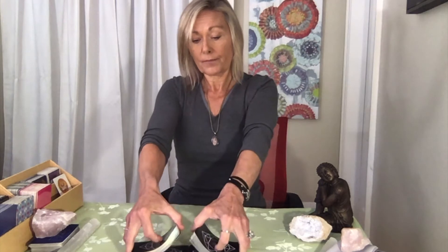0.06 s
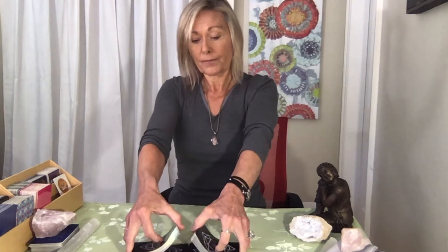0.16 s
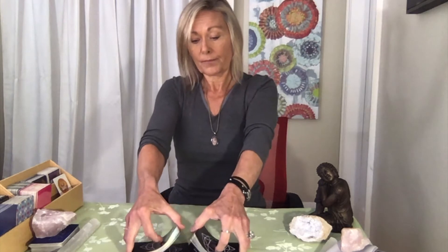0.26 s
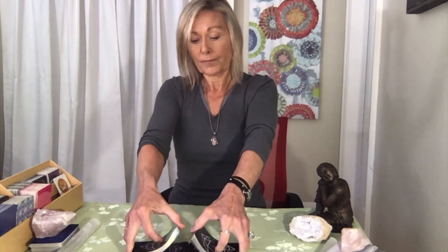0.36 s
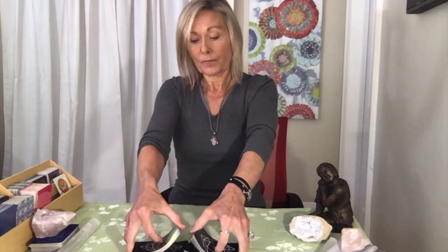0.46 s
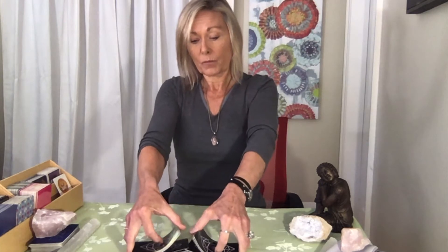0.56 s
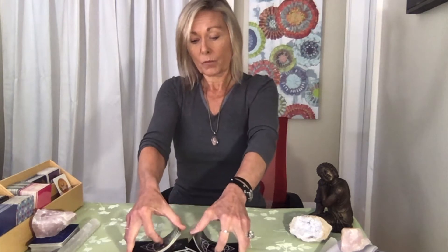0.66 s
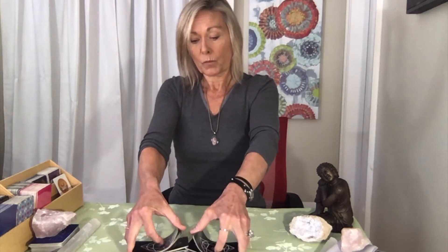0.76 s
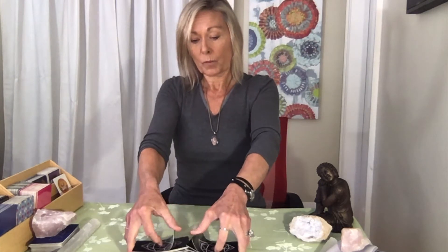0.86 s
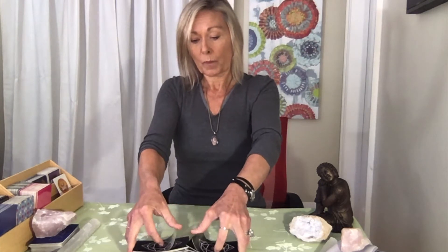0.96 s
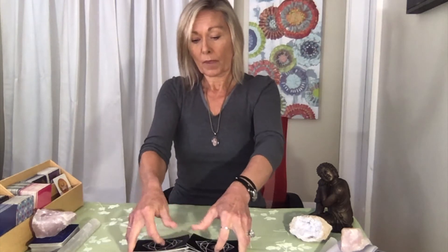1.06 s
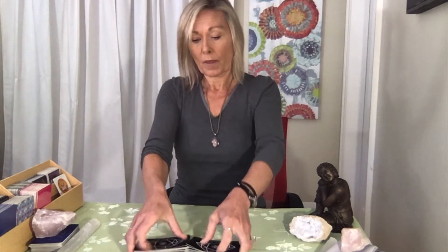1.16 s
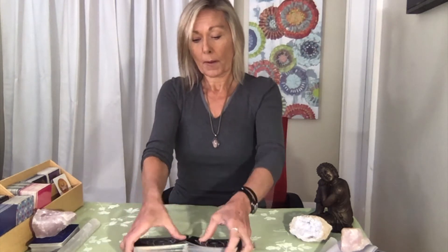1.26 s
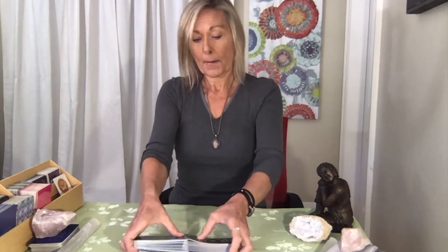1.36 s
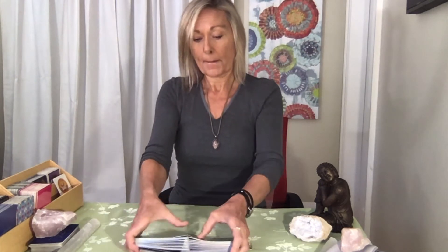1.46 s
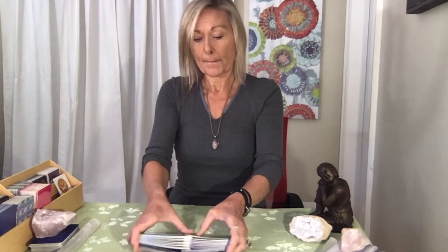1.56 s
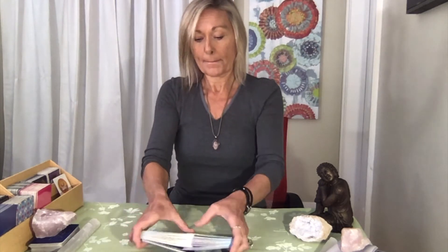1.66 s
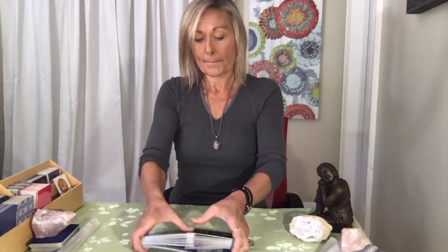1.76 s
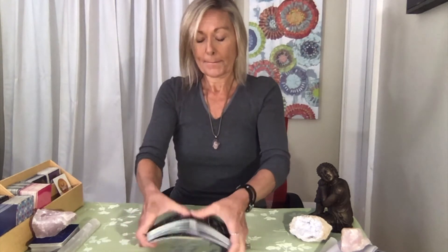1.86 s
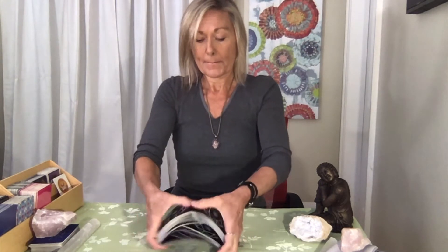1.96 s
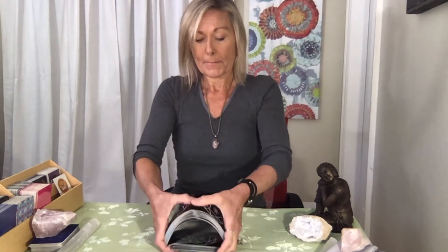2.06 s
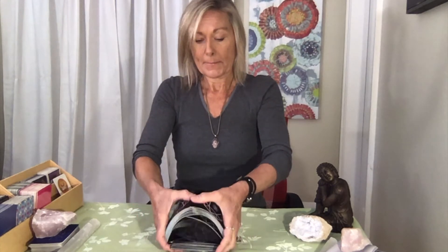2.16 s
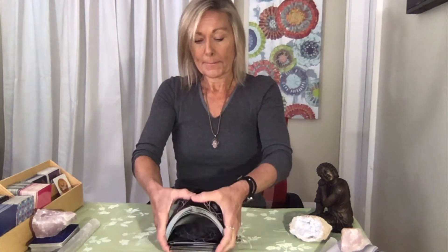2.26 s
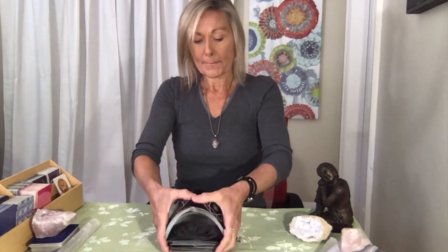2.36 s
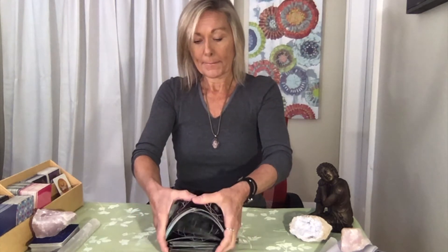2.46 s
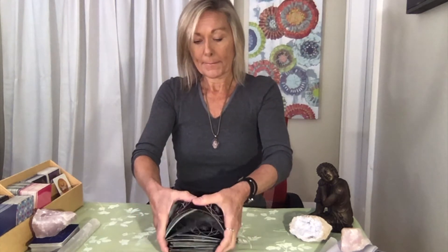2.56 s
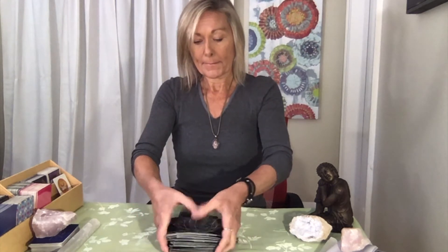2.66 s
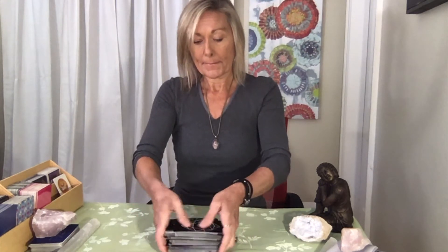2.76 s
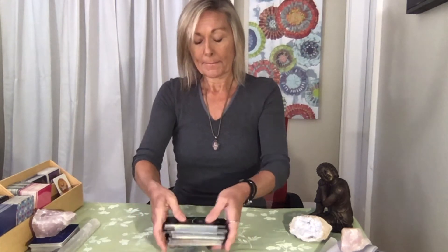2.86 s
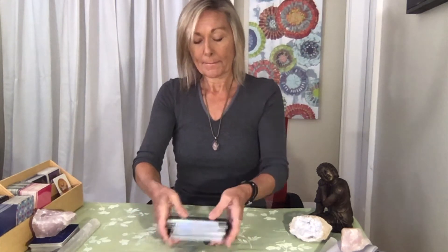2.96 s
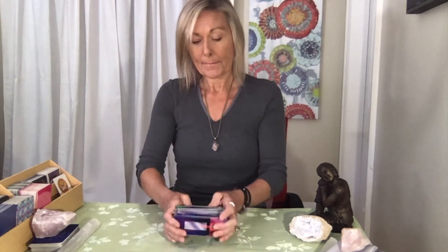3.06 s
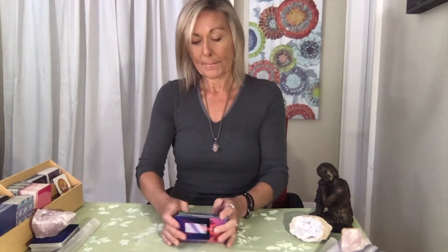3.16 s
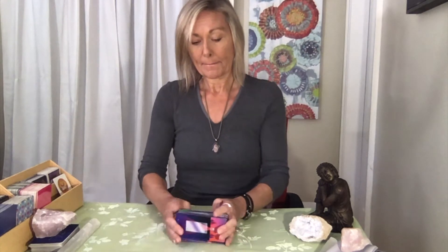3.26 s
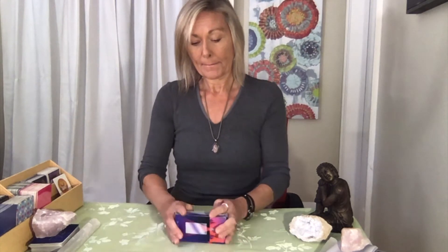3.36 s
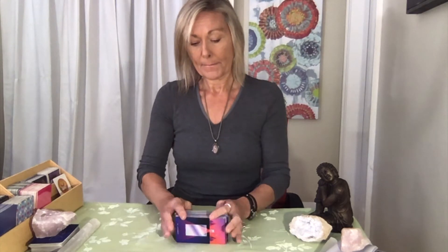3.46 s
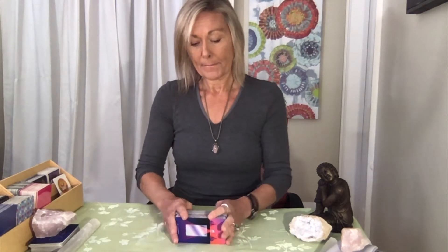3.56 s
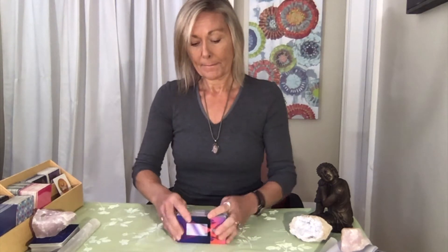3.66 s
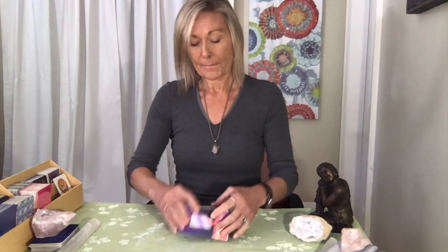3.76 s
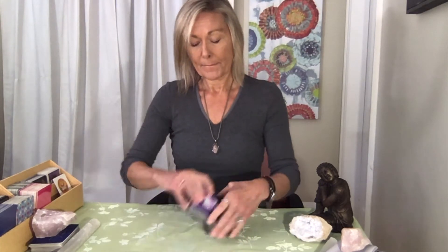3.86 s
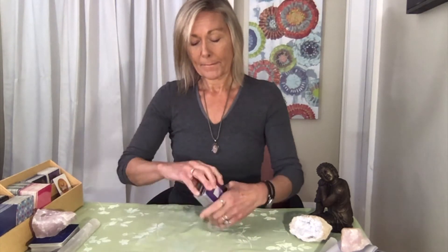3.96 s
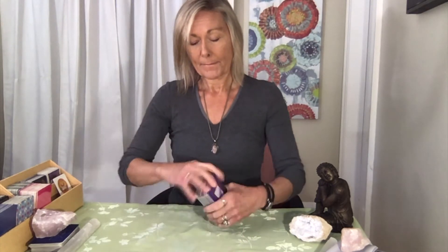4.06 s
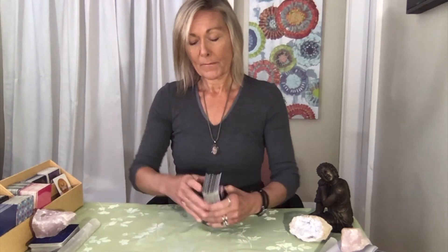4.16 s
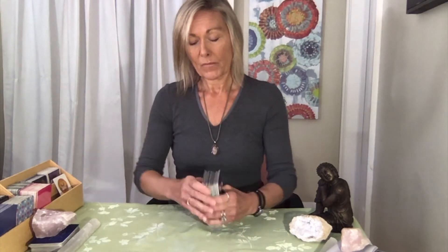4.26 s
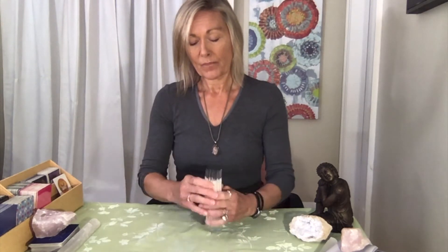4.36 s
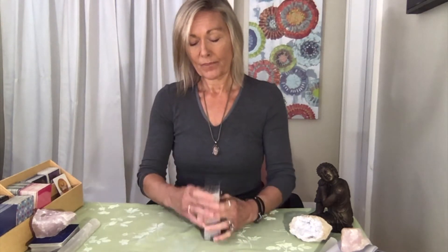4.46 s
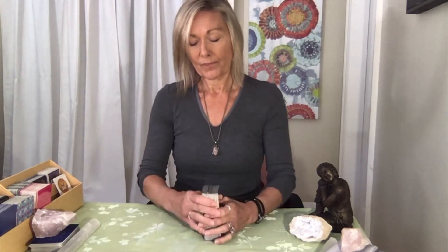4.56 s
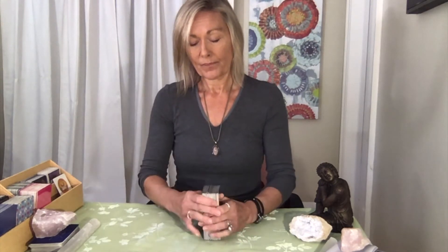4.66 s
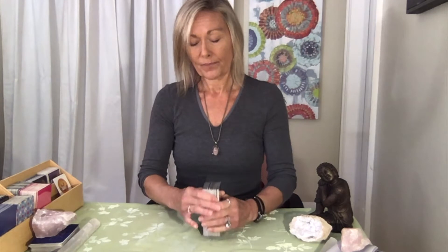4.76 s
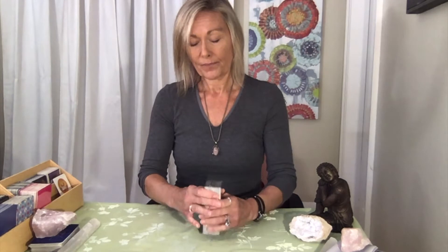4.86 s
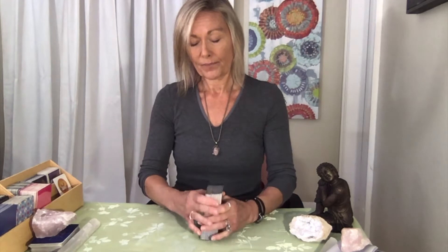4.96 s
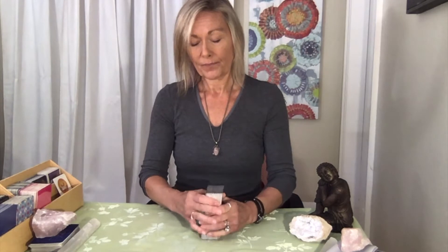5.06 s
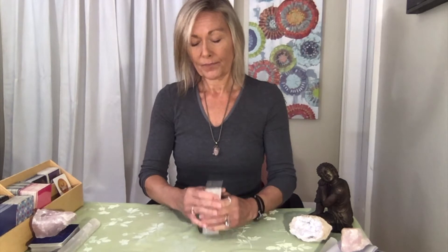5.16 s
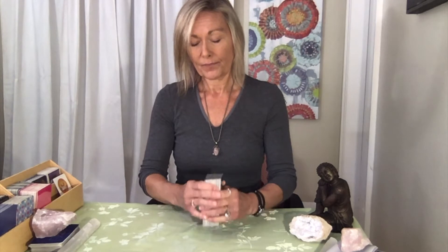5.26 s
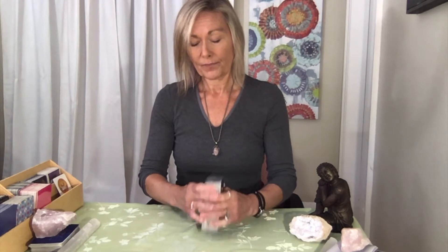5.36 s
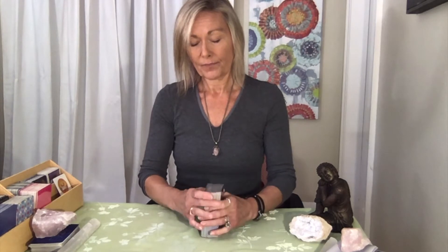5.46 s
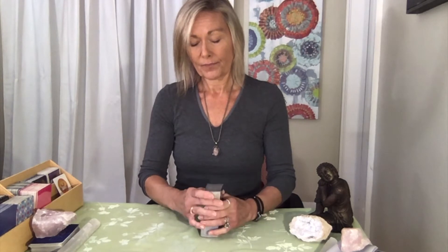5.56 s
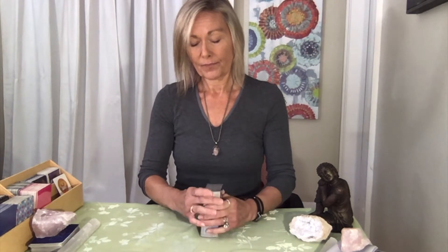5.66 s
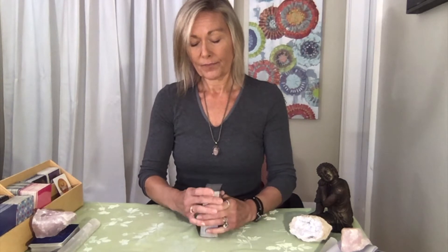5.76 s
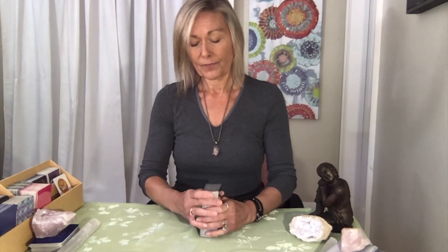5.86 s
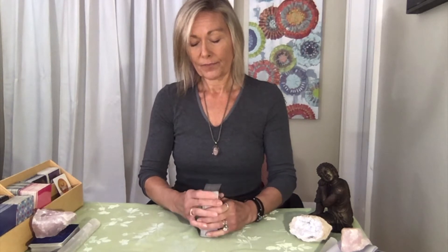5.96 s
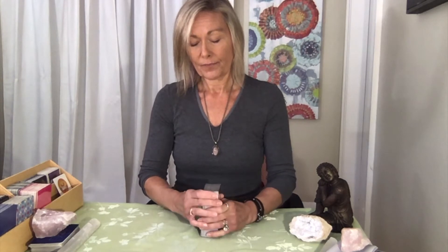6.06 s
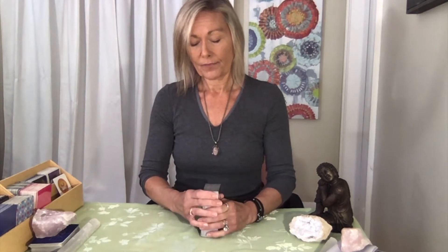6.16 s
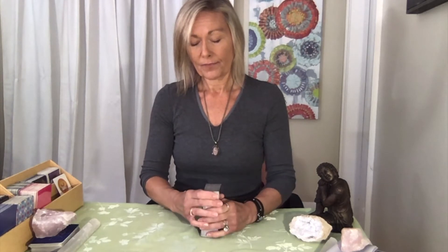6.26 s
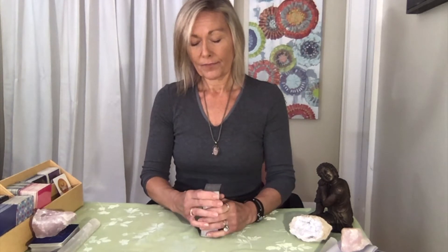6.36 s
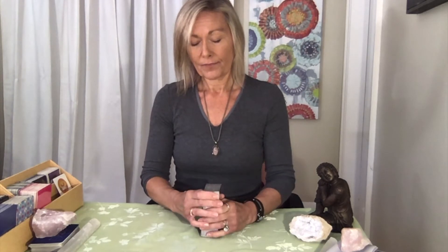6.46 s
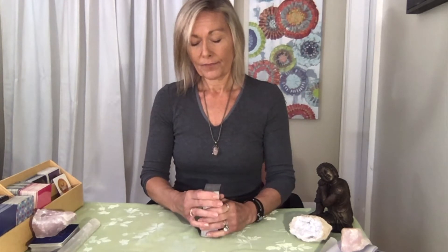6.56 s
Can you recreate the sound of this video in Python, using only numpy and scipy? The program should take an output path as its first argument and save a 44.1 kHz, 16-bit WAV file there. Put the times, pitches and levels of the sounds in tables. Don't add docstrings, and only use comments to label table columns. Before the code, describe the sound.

Stiff cards slap down in a crisp riffle, collapse in a hissing bridge, then the squared pack knocks woodenly on a table in a quiet room.

```python
import sys
import numpy as np
from scipy import signal
from scipy.fft import rfft, irfft, next_fast_len
from scipy.io import wavfile

SR = 44100
rng = np.random.default_rng(int(sys.argv[2]) if len(sys.argv) > 2 else 0)


def attenuation_scalar(level_db):
    decades = np.asarray(level_db, float) / 20
    return 10 ** decades


def wav_record(signal):
    frames = np.transpose(np.atleast_2d(signal))
    bounded = np.clip(frames, -1, 1)
    quanta = np.round(bounded * 32767).astype(np.int16)
    wavfile.write(sys.argv[1], SR, quanta)


N = 291456

# freq_hz, level_db (per Hz)
AIR_SPECTRUM = [(12, -56), (20, -21), (37, -2), (70, -10), (129, 1), (162, -9), (220, -10), (290, -20),
                (325, -13.5), (466, -20), (670, -19.5), (2100, -32.5), (3020, -40.5), (7360, -50.5),
                (15600, -69.5)]
AIR_DB = -52.5
# freq_hz, t60_s
ROOM_DECAY = [(200, 0.57), (1000, 0.44), (3000, 0.34), (8000, 0.19), (15000, 0.29)]
# delay_s, level_db
REFLECTIONS = [(.0085, -13.5), (.0026, -18.5), (0.023, -13)]
# freq_hz, width_hz, level_db
MIC_COLOUR = [(1250, 290, 2.5), (1596, 180, -3.5), (2100, 206, 3.5), (4180, 330, -2.5), (7360, 590, 1.5)]

# freq_hz, level_db, t60_s
TABLE_MODES = [(67.3, -8.5, 0.85), (95.5, -7, 0.27), (108, -11, 0.49), (127.7, 7, 0.12), (160.1, 5, 0.19),
               (176.6, 6.5, 0.12), (215, -11, 0.085), (235.2, -2, 0.29), (290, -1.5, 0.11),
               (382.3, 2.5, 0.27), (406.2, 3, 0.15), (423, -10.5, 0.19), (500, -4, 0.12), (558, -24, 0.089),
               (673.6, -5.5, 0.12), (710, -7, 0.13), (817, -7.5, 0.19), (884, -7, 0.13), (1180, -24.5, .08)]
# low_hz, high_hz, level_db, t60_s
RUMBLE_BANDS = [(39.7, 130, -27.5, 0.97), (124, 320, -24.5, 0.53), (452, 680, -30, 0.34),
                (950, 1700, -40, 0.2), (1500, 1900, -58, 0.08)]
# below_140hz_db, to_320hz_db, to_470hz_db
DECK_TAPS = [
    (2.042, -41.5, -24, -8.5, -12.5),
    (2.7, -43, -22, -9.5, -11),
    (2.098, -44, -9.5, -13, -14.5),
    (3.194, -31, -7, -32, -11),
    (4.496, -15.5, -12, -12, -10),
    (4.553, -32, -30, -4.5, -13),
    (4.946, -27, -9, -17, -10.5),
    (5.433, -18, -11.5, -4.5, -12),
    (5.46, -29.5, 0.5, -2, -9),
    (5.5, -35, -14, 0.5, -27.5),
]
TOP_MODES_DB, TOP_FOLLOWS = -8.5, 0.48
CLOTH_S = 0.012
SWAY_HZ, SWAY_DB, SWAY_T60_S, SWAY_RISE_S = 51.2, -9, 0.36, 0.064

# start_s, pressure_db, hiss_db (above pressure; grows with speed)
SLIDE_GESTURES = [
    [(0.04, -68, -32), (0.09, -54, 5.5), (0.16, -49.5, -9.5), (0.5, -48, -7.5), (0.76, -55, 0.5),
     (0.862, -39, -2.5), (0.972, -62, -8.5), (1.016, -55.5, 16), (1.2, -91, -6)],
    [(1.95, -72, -3), (2.04, -58, -3.5), (2.12, -61, 10.5), (2.22, -56.5, 3), (2.33, -56, 10),
     (2.43, -50, -8), (2.6, -59, -4), (2.68, -53, 9), (2.86, -82, -18)],
]
# start_s, length_s, level_db
FINGER_SHIFTS = [
    (1.51, 0.13, -72),
    (2.99, 0.22, -74.5),
    (3.666, 0.13, -82),
]
# freq_hz, level_db (per Hz)
BODY_SPECTRUM = [(940, -49), (1600, -12), (2080, 4.5), (2550, -0.5), (4440, -12), (5000, -15), (6500, -10),
                 (11000, -120)]
# freq_hz, level_db (per Hz)
HISS_SPECTRUM = [(2060, -9), (3500, -2.5), (4440, -5.5), (4970, -3.5), (7370, 0), (8830, -7.5),
                 (12100, -14), (13100, -15.5), (15600, -23.5)]
# freq_hz, level_db (per Hz)
FLAP_SPECTRUM = [(210, -13.5), (350, -3.5), (410, -2), (714, -4.5), (1090, -8), (1800, -11), (2340, -19),
                 (3960, -120)]
BRIDGE_BEND, BRIDGE_FLAP_DB, BRIDGE_FROM_S = 2.07, 1.5, 1.9
RUSTLE_BODY_DB, RUSTLE_HISS_DB, RUSTLE_FLAP_DB = -29, -33.5, -26
BODY_DB_PER_OCTAVE, FLAP_DB_PER_OCTAVE = 3, -8
RUSTLE_RISE_S, RUSTLE_T60_S = 0.012, 0.17
FLICKS_PER_S, FLICK_DB, FLICK_CYCLES = 170, -7.5, 8

# start_s, level_db, pitch_hz, brightness_db
CARD_SNAPS = [(2.042, -31, 1770, -10), (2.142, -31.5, 2100, 6), (2.2223, -44.5, 2220, -25),
              (2.2798, -45.5, 2800, -17.5), (2.2942, -35.5, 2210, 1), (2.394, -33.5, 1920, -25),
              (2.4166, -33.5, 2240, -24), (2.423, -32, 2050, -18), (2.444, -39, 2250, -12),
              (2.4684, -30, 1100, -2), (2.475, -27, 1310, -26), (2.4913, -34.5, 1280, -25),
              (2.5002, -70, 2010, -17), (2.5221, -68, 1260, -4), (2.5513, -30.5, 2240, -2),
              (2.599, -37, 2870, -10), (2.6672, -34.5, 1330, -2), (2.7005, -27, 1350, -13),
              (2.733, -45, 950, -25), (2.753, -47, 3400, -20), (3.55, -40, 1296, -20),
              (1.2614, -53, 2860, -45)]
SNAP_PUSH_DB = -26.5
# start_s,
# level_db, pitch_hz, table_push_db
CARD_SLAPS = [(0.0886, -36.5, 1310, -46.5), (0.1235, -34.5, 2110, -43.5), (0.1723, -36, 2520, -36.5),
              (0.181, -20.5, 1280, -41), (0.2399, -45.5, 1010, -52), (0.2811, -25, 1910, -28),
              (0.3006, -27, 2140, -39), (0.3075, -41, 2930, -48), (0.3244, -33.5, 1000, -42),
              (0.3796, -23, 1120, -28.5), (0.4194, -31, 2060, -58), (0.4564, -21, 1250, -29),
              (0.502, -22, 2100, -31.5), (0.5645, -19, 2040, -25.5), (0.5731, -20, 2440, -55),
              (0.649, -25.5, 1260, -31.5), (0.6762, -16, 2260, -37), (0.6835, -17, 3430, -30),
              (0.728, -26.5, 2100, -37.5), (0.7773, -23.5, 1870, -36), (0.8057, -26, 2150, -31.5),
              (0.8253, -21.5, 2140, -39.5), (0.8317, -37.5, 2060, -33), (0.8564, -26.5, 1220, -57),
              (0.8641, -21, 2400, -46), (0.9946, -27, 2700, -37), (1.0057, -29, 1260, -72),
              (1.0112, -19.5, 2210, -56), (1.0204, -47, 3270, -53), (0.988, -36, 3780, -42)]
CRACK_DB, CRACK_FOLLOWS = -38.5, 0.76
LOW_PUSH_DB, UPPER_PUSH_DB, MUTED_DB = -4, -5.5, -5


def rms_one(x):
    return x / np.sqrt(np.mean(x ** 2) + 1e-20)


def at_hz(points, hz):
    points = np.array(points)
    return np.interp(np.log(hz + 1e-9), np.log(points[:, 0]), points[:, 1])


def coloured(x, spectrum):
    size = next_fast_len(N)
    hz = np.arange(size // 2 + 1) * SR / size
    return rms_one(irfft(rfft(x, size) * attenuation_scalar(at_hz(spectrum, hz)), size)[:N])


def band(x, low_hz, high_hz):
    return signal.sosfilt(signal.butter(2, [low_hz, high_hz], "band", fs=SR, output="sos"), x)


def ring(clicks, hz, t60):
    radius, turn = attenuation_scalar(-60 / (t60 * SR)), 2 * np.pi * hz / SR
    return signal.lfilter([0, np.sin(turn)], [1, -2 * radius * np.cos(turn), radius ** 2], clicks + 1e-18)


def die_away(x, t60):
    return signal.lfilter([1], [1, -attenuation_scalar(-60 / (t60 * SR))], x + 1e-18)


def clicks_at(times, levels_db):
    clicks = np.zeros(N)
    clicks[np.round(times * SR).astype(int)] = attenuation_scalar(levels_db)
    return clicks


def room_air():
    return attenuation_scalar(AIR_DB) * coloured(rng.standard_normal(N), AIR_SPECTRUM)


def room(x, wet_db):
    t = np.arange(SR // 2) / SR
    white = rng.standard_normal(len(t))
    edges = 60 * 2 ** np.arange(0, 8.5)
    tail = 0
    for low, high in zip(edges, edges[1:]):
        tail = tail + band(white, low, high) * attenuation_scalar(-60 * t / at_hz(ROOM_DECAY, np.sqrt(low * high)))
    tail *= np.clip(t / 0.016, 0, 1) ** 2
    response = attenuation_scalar(wet_db) * tail / np.sqrt(np.sum(tail ** 2))
    response[0] = 1
    for delay_s, level_db in REFLECTIONS:
        response[round(delay_s * SR)] += attenuation_scalar(level_db)
    return signal.fftconvolve(x, response)[:N]


def table_knocks(times, strengths_db, contact_s, damping):
    push = np.hanning(round(contact_s * SR) + 2)
    out = np.zeros(N)
    for k, ((hz, level_db, t60), blows_db) in enumerate(zip(TABLE_MODES, strengths_db.T)):
        out += (-1) ** k * ring(clicks_at(times, blows_db + level_db), hz, t60 * damping)
    return np.convolve(out, push / push.sum())[:N]


def table_sway(times, levels_db):
    t = np.arange(SR // 2) / SR
    swell = np.clip(t / SWAY_RISE_S, 0, 1) ** 2 * attenuation_scalar(-60 * t / SWAY_T60_S)
    swing = swell * np.sin(2 * np.pi * SWAY_HZ * t)
    return signal.fftconvolve(clicks_at(times, levels_db + SWAY_DB), swing / abs(swing).max())[:N]


def table_rumble(times, levels_db):
    give = np.hanning(round(CLOTH_S * SR))
    blows = np.convolve(clicks_at(times, levels_db), give / give.sum())[:N]
    out = np.zeros(N)
    for low_hz, high_hz, level_db, t60 in RUMBLE_BANDS:
        noise = rms_one(band(rng.standard_normal(N), low_hz, high_hz))
        out += attenuation_scalar(level_db) * die_away(blows, t60) * noise
    return out


def deck_taps():
    rows = np.array(DECK_TAPS)
    times, levels_db = rows[:, 0], rows[:, 1]
    colours_db = np.c_[rows[:, 2:], TOP_MODES_DB + TOP_FOLLOWS * rows[:, 3]]
    group = np.searchsorted([140, 320, 470], np.array(TABLE_MODES)[:, 0])
    strengths_db = levels_db[:, None] + colours_db[:, group] + 0.59
    knocks = table_knocks(times, strengths_db, contact_s=0.0013, damping=0.87)
    return knocks + table_rumble(times, levels_db) + table_sway(times, levels_db + rows[:, 2])


def flutter(per_s, depth_db):
    knots = rng.standard_normal(round(N / SR * 400))
    slow = rms_one(signal.sosfilt(signal.butter(1, per_s / 200, output="sos"), knots))
    return attenuation_scalar(depth_db * np.interp(np.arange(N) / SR * 400, np.arange(len(slow)), slow))


def rustle(times, levels_db):
    rise = np.exp(-1 / (RUSTLE_RISE_S * SR))
    return signal.lfilter([1 - rise], [1, -rise], die_away(clicks_at(times, levels_db), RUSTLE_T60_S))


def corner_flicks():
    sizes = attenuation_scalar(3.5 * np.minimum(rng.exponential(1, N), 3)) * (rng.random(N) < FLICKS_PER_S / SR)
    dealt = rng.integers(0, 8, N)
    smear = rng.standard_normal(60) * np.hanning(60)
    struck = np.zeros(N)
    for k, hz in enumerate(np.geomspace(1100, 7000, 8)):
        struck += ring(sizes * (dealt == k), hz, FLICK_CYCLES / hz)
    return rms_one(band(np.convolve(struck, smear)[:N], 900, 9000))


def friction_grain():
    sizes = attenuation_scalar(1.35 * np.minimum(rng.exponential(1, N), 4)) * rng.choice([-1, 1], N)
    ticks = rms_one(sizes * (rng.random(N) < 700 / SR))
    return ticks * 0.3 + rng.standard_normal((3, N))


def slide_levels():
    t = np.arange(N) / SR
    s, peak_db, hz, _ = np.transpose([*CARD_SLAPS, *CARD_SNAPS])
    body = rustle(s, peak_db + RUSTLE_BODY_DB + BODY_DB_PER_OCTAVE * np.log2(hz / 2000))
    hiss = rustle(s, peak_db + RUSTLE_HISS_DB)
    flap = rustle(s, peak_db + RUSTLE_FLAP_DB + FLAP_DB_PER_OCTAVE * np.log2(hz / 1500))
    for rows in SLIDE_GESTURES:
        s, body_db, hiss_db = np.transpose([(rows[0][0] - 0.03, -100, 0), *rows])
        body += attenuation_scalar(np.interp(t, s, body_db - 9.5, -140, -140))
        hiss += attenuation_scalar(np.interp(t, s, body_db + hiss_db - 6.5, -140, -140))
        flap += attenuation_scalar(np.interp(t, s, body_db - hiss_db - 23, -140, -140))
    for s, length_s, level_db in FINGER_SHIFTS:
        touch = attenuation_scalar(level_db) * np.sin(np.pi * np.clip((t - s) / length_s, 0, 1))
        body += attenuation_scalar(-22.5) * touch
        hiss += attenuation_scalar(-11.5) * touch
        flap += attenuation_scalar(2) * touch
    return body, hiss, flap


def card_slides():
    body, hiss, flap = slide_levels()
    grain = friction_grain()
    flat = coloured(grain[2], FLAP_SPECTRUM)
    arched = attenuation_scalar(BRIDGE_FLAP_DB) * coloured(grain[2], np.array(FLAP_SPECTRUM) * [BRIDGE_BEND, 1])
    flapping = np.where(np.arange(N) / SR < BRIDGE_FROM_S, flat, arched)
    mix = body * flutter(83, depth_db=2) * coloured(grain[0], BODY_SPECTRUM)
    mix += hiss * flutter(96, depth_db=1.5) * coloured(grain[1], HISS_SPECTRUM)
    mix += flap * flutter(60, depth_db=0.5) * flapping
    mix += (body + hiss) * attenuation_scalar(FLICK_DB) * corner_flicks()
    return flutter(40, depth_db=1.2) * mix


def card_hit(hz, crack_db, body_db, crack_s):
    t = np.arange(1024) / SR
    dull, sharp = rng.standard_normal((2, 1024)) * np.exp(-t / crack_s) * np.clip(t / 0.001, 0, 1)
    dull[30] -= 2.5
    flap = band(band(dull, 0.33 * hz, 2.8 * hz), 0.5 * hz, 5.8 * hz)
    body = ring(dull, hz, 6 / hz) + 2.5 * ring(dull, hz * 1.51, 3 / hz) + 5 * flap
    crack = band(band(sharp, 3200, 13000), 2600, 17000)
    return attenuation_scalar(body_db) * body / abs(body).max() + attenuation_scalar(crack_db - 10.5) * crack / abs(crack).max()


def card_hits(rows, crack_db, body_db, crack_s):
    out = np.zeros(N + 1024)
    for (s, peak_db, hz, _), edge_db in zip(rows, crack_db):
        out[round(s * SR):][:1024] += attenuation_scalar(peak_db) * card_hit(hz, edge_db, body_db, crack_s)
    return out[:N]


def card_thuds(times, push_db):
    mode_hz = np.array(TABLE_MODES)[:, 0]
    strengths_db = push_db[:, None] + np.where(mode_hz > 270, UPPER_PUSH_DB, LOW_PUSH_DB)
    strengths_db += rng.normal(0, 3.9, strengths_db.shape)
    strengths_db += MUTED_DB * (abs(mode_hz - 400) < 30)
    return table_knocks(times, strengths_db, contact_s=0.0021, damping=0.51)


def bridge_snaps():
    s, peak_db, _, bright_db = np.transpose(CARD_SNAPS)
    cards = card_hits(CARD_SNAPS, bright_db, body_db=-1.6, crack_s=0.0024)
    return cards, attenuation_scalar(-16.5) * card_thuds(s, peak_db + SNAP_PUSH_DB)


def riffle_slaps():
    s, peak_db, _, push_db = np.transpose(CARD_SLAPS)
    crack_db = CRACK_DB + CRACK_FOLLOWS * (peak_db + 15.5) - peak_db
    cards = card_hits(CARD_SLAPS, crack_db, body_db=-0.3, crack_s=0.0019)
    return cards, card_thuds(s, push_db)


def scene():
    snaps, snap_thuds = bridge_snaps()
    slaps, slap_thuds = riffle_slaps()
    cards = room(slaps + snaps + card_slides(), wet_db=-12)
    thuds = attenuation_scalar(-2) * room(slap_thuds + snap_thuds, wet_db=-10)
    return (room_air() + deck_taps() + thuds + cards)[None]


def low_pass(x):
    return signal.sosfilt(signal.butter(12, 15760, fs=SR, output="sos"), x)


def record(dry):
    size = next_fast_len(N)
    hz = np.arange(size // 2 + 1) * SR / size
    colour_db = np.zeros(len(hz))
    for centre_hz, width_hz, level_db in MIC_COLOUR:
        colour_db += level_db * np.exp(-0.5 * (2 * (hz - centre_hz) / width_hz) ** 2)
    heard = irfft(rfft(dry, size) * attenuation_scalar(colour_db), size)[:, :N]
    heard = signal.sosfilt(signal.butter(3, 45, "high", fs=SR, output="sos"), heard)
    return low_pass(heard)


dry = scene()
out = record(dry)
wav_record(out)
```